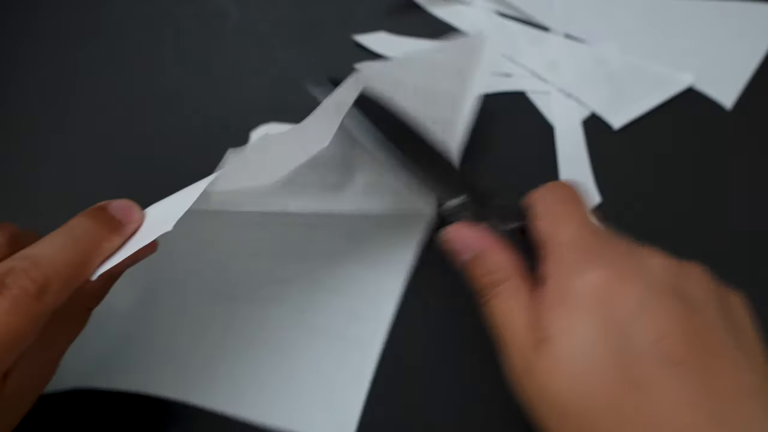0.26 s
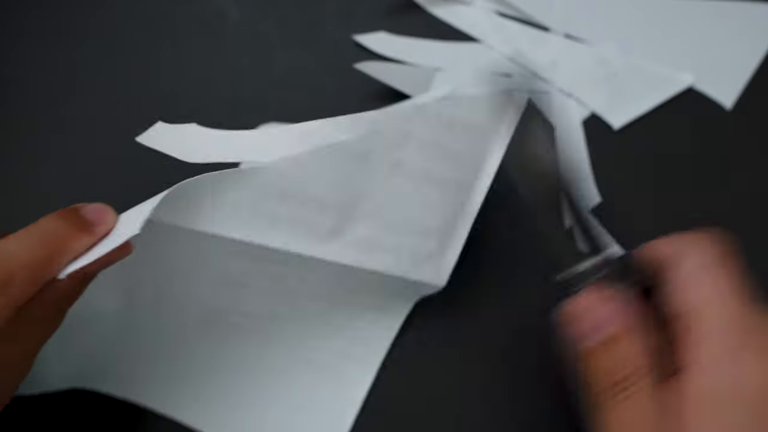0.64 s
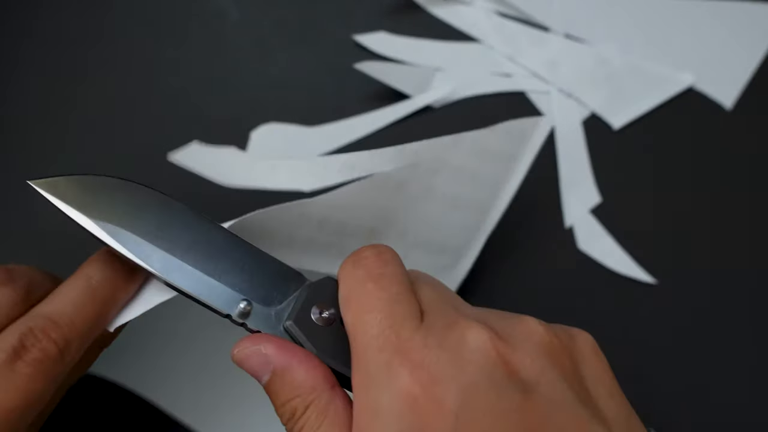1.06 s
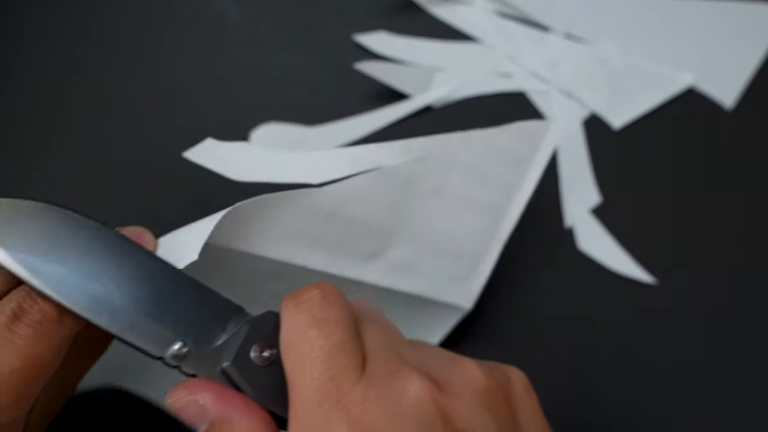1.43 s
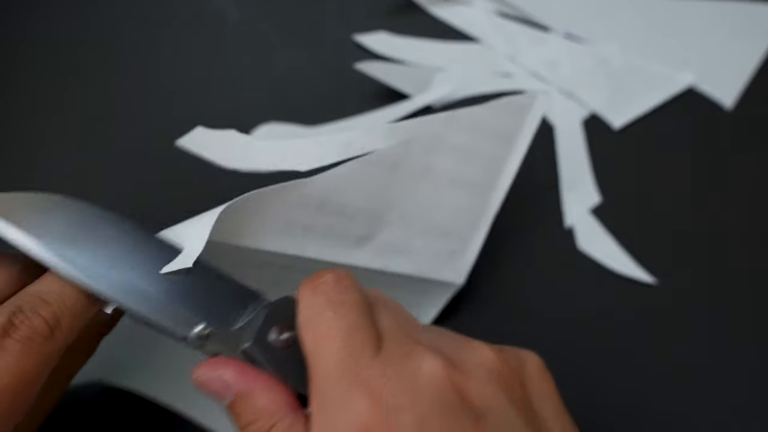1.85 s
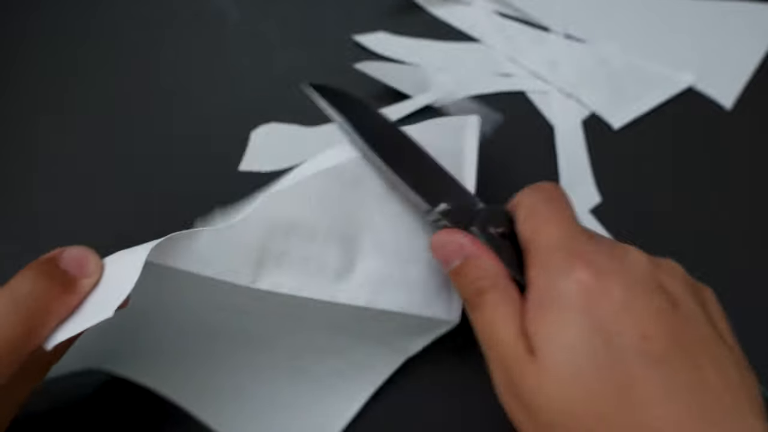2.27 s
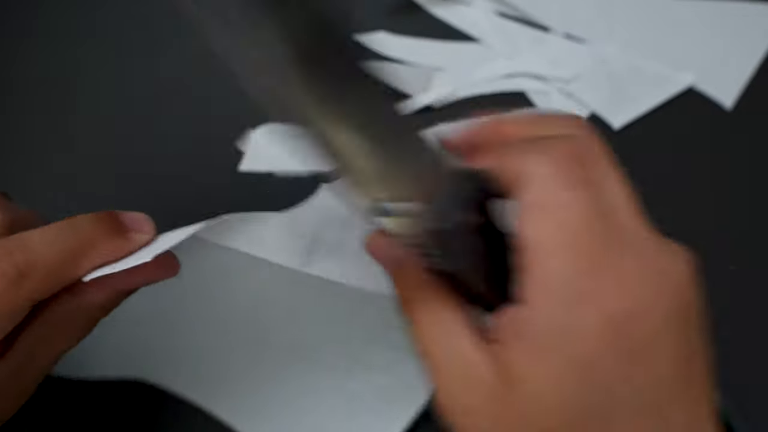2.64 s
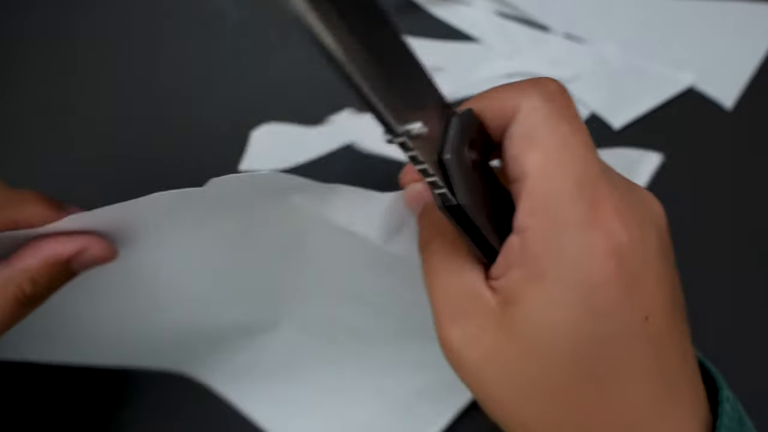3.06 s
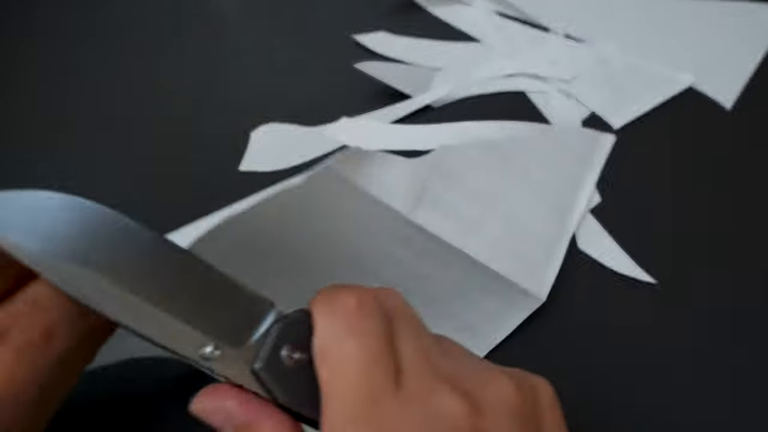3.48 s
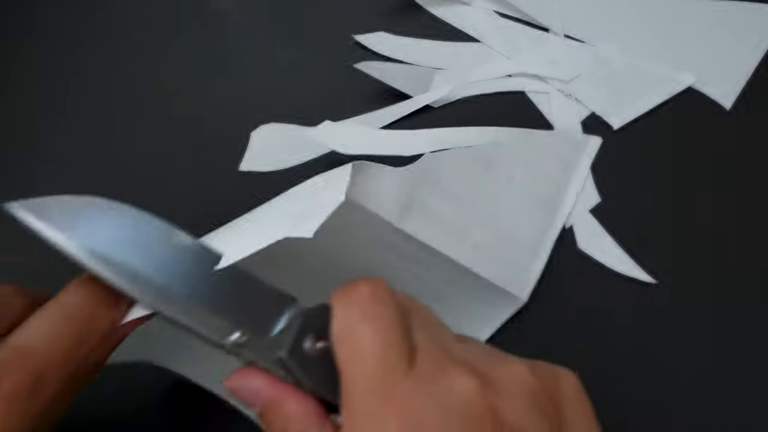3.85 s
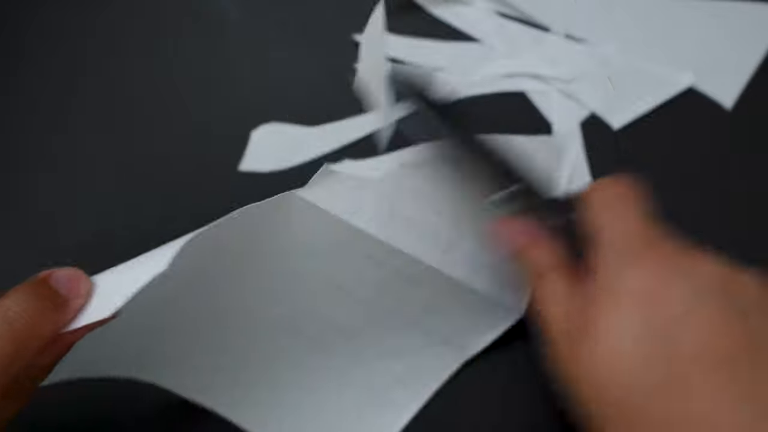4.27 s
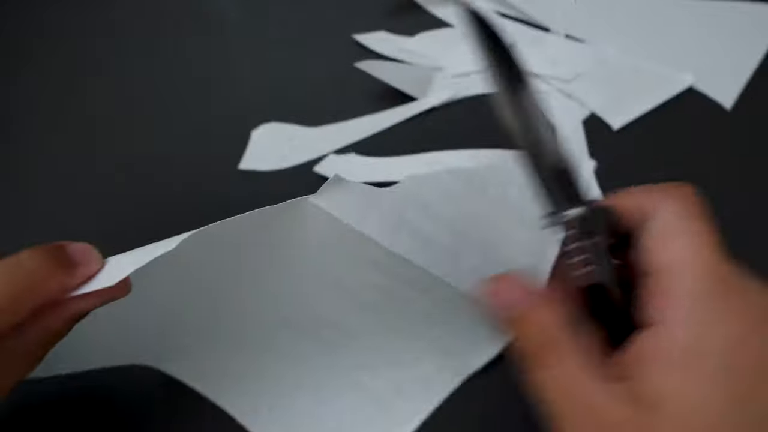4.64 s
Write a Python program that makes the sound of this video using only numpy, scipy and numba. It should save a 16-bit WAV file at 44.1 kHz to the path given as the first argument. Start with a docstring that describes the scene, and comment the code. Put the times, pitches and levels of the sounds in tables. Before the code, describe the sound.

Three crisp cuts tear through stiff paper, each a dense fibrous rasp, separated by soft flapping, crinkling and faint sliding of blade and skin.

```python
"""A knife slices three strips off a hand-held sheet of paper, close to one microphone in a quiet room.
Each cut is a dense crackle of snapping fibres that rings the sheet through moving resonances.
The loose sheet flaps in low noise puffs and buckles in short pitched pops, and grainy hisses are
skin and blade sliding on the paper. The room adds a short diffuse tail, a low hum and a faint hiss."""
import sys
import numpy as np
from scipy import signal
from scipy.fft import rfft, irfft
from scipy.io import wavfile
from scipy.ndimage import uniform_filter1d
from numba import njit

SR = 44100
rng = np.random.default_rng(int(sys.argv[2]) if len(sys.argv) > 2 else 0)


def level_to_linear(level):
    """Convert decibel levels to linear amplitude factors, elementwise."""
    exponent = np.asarray(level, float) / 20
    return 10 ** exponent


def wav_record(signal):
    """Record a signal, one row per channel, as 16-bit PCM in the file named by sys.argv[1]."""
    frames = np.transpose(np.atleast_2d(signal))
    bounded = np.clip(frames, -1, 1)
    # unit amplitude maps onto the largest positive 16-bit level
    quanta = np.round(bounded * 32767).astype(np.int16)
    wavfile.write(sys.argv[1], SR, quanta)


N = 216442  # length in samples

# the three cuts: t/s, tearing level/dB, upper ring f/Hz, low ring f/Hz, low ring level/dB re tearing
CUTS = [
    [(0.0, -27, 4000, 1300, -5.5), (0.04, -24.5, 3570, 1650, -8.5), (0.1, -26.5, 4150, 1340, -2),
     (0.142, -27.5, 4960, 1730, 0.5), (0.188, -25.5, 4430, 1680, -1.5), (0.218, -23.5, 4500, 1360, -4.5),
     (0.254, -26.5, 4370, 1300, -2), (0.342, -30, 4530, 1730, 1.5), (0.466, -37, 4400, 1680, 3),
     (0.516, -32.5, 4140, 1790, -9.5), (0.54, -44.5, 4080, 1820, 9)],
    [(1.943, -40, 4360, 1360, 0), (1.949, -28, 4930, 1540, -4), (1.998, -22.5, 4900, 1720, -10.5),
     (2.022, -23.5, 4560, 1800, -7.5), (2.052, -22.5, 4500, 1740, -15.5), (2.08, -23, 4460, 1680, -3),
     (2.102, -21, 4550, 1440, -13.5), (2.136, -25, 4000, 1260, -2.5), (2.194, -29, 4400, 1390, -8.5),
     (2.236, -24, 4750, 1110, -2.5), (2.275, -42, 4340, 1130, -9)],
    [(3.841, -45.5, 4030, 1410, 1), (3.975, -34.5, 4440, 1390, 3), (4.011, -30.5, 4600, 1930, 6),
     (4.073, -26.5, 4600, 2070, 2.5), (4.113, -28, 4350, 1730, 1.5), (4.153, -26.5, 4900, 1610, 0),
     (4.245, -23.5, 4480, 1720, -2.5), (4.298, -21.5, 4540, 1500, -4), (4.311, -21.5, 4750, 1250, -5.5),
     (4.337, -19.5, 4820, 1340, -8.5), (4.355, -34, 4940, 1330, -24)],
]
# fizz of each cut re its tearing: level at its start/dB, level at its end/dB
CUT_FIZZ_LEVELS = [(-10.5, -3), (-9, -7.5), (-8, -8)]
# spectrum of the cutting fizz: f/Hz, relative level per Hz/dB
FIZZ_SPECTRUM = [(2940, -35), (5000, -8), (6890, 4), (7560, 0), (10000, 4), (12400, 1.5), (16000, -4.5)]
# resonances of the sheet over the table: f/Hz, width/Hz, lift/dB
SHEET_RESONANCES = [(1204, 230, 5.5), (2030, 296, 6), (3280, 690, 6), (5190, 1030, 3), (5920, 800, 2.5),
                    (7890, 1200, 5)]
# short-lived narrow resonances in the cutting and sliding sounds:
# start t/s, end t/s, f/Hz, width/Hz, lift/dB
BRIEF_RINGS = [(0, .16, 15000, 1200, 9), (0.332, .47, 11800, 1300, 10.5), (1.946, 2.092, 1370, 248, 5),
               (1.97, 2.12, 12200, 350, 11), (2.15, 2.245, 4400, 400, 6), (3.05, 3.25, 5100, 500, 6),
               (3.93, 4.11, 5600, 350, 6), (4.3, 4.34, 1300, 300, 6), (4.09, 4.327, 4950, 400, 3.5)]
# the loose sheet wobbles, during the cuts or when let go or turned:
# start t/s, swell/s, hold/s, level/dB, deepest part level/dB re that
WOBBLES = [(0, 0.038, 0.48, -33.5, -13), (.42, 0.06, 0.064, -38.5, -2), (.56, 0.013, 0.096, -53, 2.5),
           (1.11, 0.02, 0.083, -47.5, -10), (1.52, 0.011, 0.09, -49.5, -1), (2.09, 0.064, 0.055, -34.5, -8),
           (2.24, 0.0067, 0.0025, -27, -12.5), (2.28, .01, 0.13, -54.5, 5),
           (2.388, 0.0045, 0.14, -47.5, -7.5), (2.8, 0.1, 0.048, -45, 3), (2.96, 0.024, 0.15, -45, -1.5),
           (3.31, 0.0093, 0.025, -34.5, -5.5), (3.42, 0.074, 0.066, -51, -19),
           (3.625, 0.0037, 0.012, -51, -20), (3.82, 0.063, 0.074, -42, -16)]
# resonances of the flapping sheet: f/Hz, width/Hz, relative level/dB
FLAP_RINGS = [(226, 42, -1), (365, 148, -3), (523, 1040, -5)]
# spectrum of the room floor: f/Hz, relative level per Hz/dB
AIR_SPECTRUM = [(12, -40), (20, 6.5), (40, -6.5), (65, -14), (123, -9.5), (177, -16.5), (248, -14),
                (293, -17), (513, -22.5), (738, -24.5), (802, -24), (1300, -31), (16000, -49.5)]
# decay of the room tail by 60 dB: f/Hz, time/s
ROOM_T60 = [(200, 0.89), (1400, 0.38), (4000, 0.63), (10000, 0.42)]
# the sheet buckles or is touched:
# t/s, peak level/dB, pitch f/Hz, crisp edge level/dB re peak, thump level/dB re peak
POPS = [(0.456, -24, 1890, -8, -0.5), (0.517, -23, 730, -21, -2.5), (0.589, -34.5, 1610, -13, 1.5),
        (1.179, -35, 1850, -16, -26), (1.802, -33.5, 1370, 6, -5.5), (2.199, -9, 1680, -9, -12),
        (2.248, -15.5, 343, -2.5, -7.5), (2.332, -30.5, 1260, 0, -17), (2.391, -32.5, 1010, -2, -0.5),
        (2.474, -29, 980, -26, -2), (2.505, -34.5, 996, -3, 1.5), (2.823, -32.5, 1010, -11, -8),
        (2.852, -29, 960, -25, -5), (2.879, -26.5, 1390, -22, -17), (2.899, -28.5, 1130, -1.5, 1.5),
        (2.952, -29, 1200, -6.5, -14), (2.975, -35, 900, -10, -5), (2.986, -29.5, 1000, -15, -5),
        (3.05, -24, 1460, -12, -22), (3.079, -24.5, 990, -16, -9), (3.2, -47, 1550, -14, 6),
        (3.266, -38, 1290, 3, -20), (3.281, -27.5, 1160, -7, -10), (3.289, -24.5, 1700, -16, -6.5),
        (3.311, -23, 1190, -28, -12), (3.321, -18, 1060, -26, -15.5), (3.326, -19.5, 2300, -25, -10.5),
        (3.336, -22, 1480, -30, -17), (3.36, -29, 1400, -25, -25), (3.435, -39.5, 1010, -2, 3),
        (3.463, -24.5, 1750, -29, -32), (3.468, -26.5, 615, -33, -17), (3.532, -40.5, 750, -8, 2.5),
        (3.626, -40.5, 2030, 5.5, -25), (3.634, -44.5, 395, -26, 3), (3.822, -30, 1930, -22, -4.5),
        (4.333, -9.5, 4500, -10, -18), (4.532, -39, 1190, -19, -25), (4.566, -53, 696, -21, -1),
        (4.609, -48, 1000, -7, -6), (4.678, -50.5, 905, -11, 6), (4.715, -59, 2000, 8, 0)]
# fingers or blade slide on the paper: start t/s, swell/s, hold/s, level/dB, body level/dB re that
SLIDES = [(.55, .005, 0.037, -49, -2), (.615, 0.0032, 0.034, -49.5, -2), (.74, 0.013, 0.021, -54.5, -3.5),
          (.8, 0.026, 0.13, -62, 0), (1.055, .005, 0.027, -62, 0), (1.11, 0.0077, .08, -46.5, -3),
          (1.25, 0.029, 0.013, -53, -2.5), (1.39, .002, .015, -56, -2), (1.4, 0.029, 0.033, -53, -1),
          (1.48, 0.057, 0.021, -46, -4), (1.57, 0.0082, 0.036, -53, -1), (1.8, 0.0036, 0.0086, -46, -2),
          (1.892, 0.0017, .003, -42, -2.5), (1.908, .002, .008, -41, -6),
          (1.921, 0.003, 0.0036, -37.5, -1.5), (1.936, .002, .006, -38, -13),
          (2.27, 0.0055, 0.092, -43, -2.5), (2.37, .01, 0.096, -54, -12), (2.5, 0.0054, 0.026, -54.5, -9),
          (2.6, 0.027, 0.047, -54, -1), (2.7, 0.0091, 0.06, -52, -1), (2.79, 0.0099, 0.19, -49.5, -4),
          (2.95, 0.077, 0.12, -42.5, -5.5), (3.17, 0.012, 0.056, -50.5, -4), (3.225, 0.022, 0.034, -60, 6),
          (3.262, 0.0082, 0.26, -53.5, 2.5), (3.553, 0.0023, 0.17, -54, -3), (3.762, 0.0016, 0.013, -43, 0),
          (4.355, .005, 0.038, -42.5, -9), (4.56, 0.062, .12, -61, -7), (4.705, .008, 0.054, -60, -3.5),
          (4.76, 0.015, .15, -56, -2)]
# spectrum of the sliding hiss: f/Hz, relative level per Hz/dB
SLIDE_SPECTRUM = [(1180, -22), (2000, -27), (4450, -3.5), (4990, -8), (6090, -9), (11100, -16),
                  (16000, -20)]

UPPER_RING_DB = -1  # re tearing
CUT_WOBBLE_DB, CUT_DEEP_DB = -14, -14  # shake of a cut re its low ring, deepest part re that
WOBBLE_SAG_DB_S, WOBBLE_FALL_DB_S = 37, 282  # loss from the end of the swell, extra loss after the hold
SLIDE_SAG_DB_S, SLIDE_FALL_DB_S = 26, 330
SWELL_POWER = 0.73  # a swell grows as this power of its time
POP_T60_S = 0.038
AIR_DB, ROOM_DB = -52.5, -15.5  # floor rms, tail energy re direct sound
TOP_HZ = 15900


def level(x, db):
    """Scale to an rms level."""
    return x * level_to_linear(db) / np.sqrt(np.mean(x ** 2))


@njit
def svf(x, hz, width):
    """State-variable band-pass with a moving centre, gain 1 at the centre."""
    y, mid, low = np.empty(len(x)), 0., 0.
    for i in range(len(x)):
        g = np.tan(np.pi * hz[i] / SR)
        damping = width / hz[i]
        v = (mid + g * (x[i] - low)) / (1 + g * (g + damping))
        mid = 2 * v - mid
        low = low + 2 * g * v
        y[i] = damping * v
    return y


def band(x, hz, width_hz):
    """Band-pass at a fixed or moving centre."""
    centre = np.clip(hz + np.zeros(len(x)), 20, SR / 2.5)
    return svf(x, centre, max(1. * width_hz, 10.))


def colour(x, points):
    """Shape a spectrum by (Hz, dB) points, joined by lines over log frequency."""
    hz, db = np.transpose(points)
    f = np.maximum(np.arange(len(x) // 2 + 1) * SR / len(x), 1)
    gain = level_to_linear(np.interp(np.log(f), np.log(hz), db))
    return irfft(rfft(x) * gain, len(x))


def walk(rate):
    """Random levels held 1 / rate s and slewed twice; spread near 1."""
    hold = max(int(SR / rate), 1)
    steps = np.repeat(rng.standard_normal(N // hold + 1), hold)
    return uniform_filter1d(uniform_filter1d(steps, hold), hold)[:N]


def play(tables):
    """Join the tables into per-sample columns, with a gain that is silent between them."""
    t = np.arange(N) / SR
    s, *columns = np.concatenate(tables).T
    order = np.argsort(s, kind="stable")
    on = sum((t >= rows[0][0]) & (t <= rows[-1][0]) for rows in tables) > 0
    columns = [np.interp(t, s[order], c[order]) for c in columns]
    gain = uniform_filter1d(on * level_to_linear(columns[0]), size=120)
    return gain, columns[1:]


def strokes(rows, sag_db_s, fall_db_s):
    """Each row swells, holds while sagging and falls away; gains of its main and second parts."""
    t, main, second = np.arange(N) / SR, 0, 0
    for s, swell, hold, db, second_db in rows:
        since = t - s - swell
        rise = np.clip((t - s) / max(swell, 1e-3), 0, 1) ** SWELL_POWER
        loss_db = sag_db_s * np.maximum(since, 0) + fall_db_s * np.maximum(since - hold, 0)
        power = (rise * level_to_linear(db - loss_db)) ** 2
        main = main + power
        second = second + power * level_to_linear(second_db) ** 2
    return np.sqrt(main), np.sqrt(second)


def snaps(per_s, spread_db, hiss_db):
    """Fibres let go at random moments, a few far harder than the rest, over a fine hiss."""
    hit = rng.random(N) < per_s / SR
    size = np.minimum(rng.exponential(size=N), 5)
    crackle = level(hit * level_to_linear(spread_db * size), 0)
    return crackle + level(rng.standard_normal(N), hiss_db)


def sheet(x, patchy_db):
    """Resonances swell and drift as the sheet bends; waves bounce back from edges and creases."""
    for hz, width_hz, db in SHEET_RESONANCES:
        lift = level_to_linear(db + patchy_db * walk(20)) - 1
        x = x + lift * band(x, hz * np.exp(0.041 * walk(9)), width_hz)
    # edges and creases lie at uneven distances
    lags = (SR * rng.uniform(0.0005, 0.006, size=12)).astype(int)
    shares = [0.17 * walk(16) for _ in lags]
    echoes = sum(g * np.roll(x, lag) for g, lag in zip(shares, lags))
    # the echoes only share out the energy of the source
    return (x + echoes) / np.sqrt(1 + np.sum(np.square(shares), axis=0))


def brief_rings(x):
    """Short-lived narrow resonances fade in and out over about 20 ms."""
    t = np.arange(N) / SR
    for start, end, hz, width_hz, db in BRIEF_RINGS:
        on = uniform_filter1d(1. * ((t >= start) & (t < end)), size=880)
        x = x + on * (level_to_linear(db) - 1) * band(x, hz, width_hz)
    return x


def cut():
    """Tearing fibres ring the free strip, whose two main resonances move as the blade travels."""
    gain, (upper_hz, low_hz, low_db) = play(CUTS)
    ends = [rows[k][0] for rows in CUTS for k in (0, -1)]
    fizz_db = np.interp(np.arange(N) / SR, ends, np.ravel(CUT_FIZZ_LEVELS))
    # low ring, upper ring and fizz each flutter in level at random, independently
    flutters = [level_to_linear(1.5 * walk(110)) for _ in range(3)]
    fibres = brief_rings(sheet(snaps(6000, 2.6, 1.5), patchy_db=1.5))
    low_tilt = [(300, 12), (700, 5.5), (1000, 4.5), (2300, -2.0), (4000, -16.5)]
    low = level(colour(band(fibres, low_hz, 1030), low_tilt), 0)
    upper = level(band(band(fibres, upper_hz, 1440), 2560, 6200), 0)
    fizz = level(colour(fibres, [(2500, -65)] + FIZZ_SPECTRUM), 0)
    low = level_to_linear(low_db) * flutters[0] * low
    upper = level_to_linear(UPPER_RING_DB) * flutters[1] * upper
    fizz = level_to_linear(fizz_db) * flutters[2] * fizz
    return gain * (low - upper + fizz)  # the upper ring is in opposite polarity


def flap():
    """The wobbling sheet pushes air in uneven low puffs, coloured by the gap over the table."""
    gain, deep_gain = strokes(WOBBLES, WOBBLE_SAG_DB_S, WOBBLE_FALL_DB_S)
    tearing, (_, _, low_db) = play(CUTS)
    shake = tearing * level_to_linear(low_db + CUT_WOBBLE_DB)  # a cut shakes the sheet too
    push = rng.standard_normal(N) * level_to_linear(6.5 * walk(29.9))
    rings = [level_to_linear(db) * band(band(push, hz, w), hz, 2 * w) for hz, w, db in FLAP_RINGS]
    puffs = level(sum(rings), 0)
    deep = level(band(band(push, 125, 52), 110, 110), 0)
    return np.hypot(gain, shake) * puffs + np.hypot(deep_gain, level_to_linear(CUT_DEEP_DB) * shake) * deep


def air():
    """Room hum and microphone hiss, noise shaped by its spectrum and wavering a little."""
    floor = colour(rng.standard_normal(N), AIR_SPECTRUM)
    return level(floor * level_to_linear(1.8 * walk(3.18)), AIR_DB)


def room(x):
    """A diffuse tail from 8 ms on, built of octave bands of noise that each decay at their own rate."""
    t, tail = np.arange(SR) / SR, 0
    hz, t60 = np.transpose(ROOM_T60)
    for f in 125 * 2. ** np.arange(8):
        fade = np.exp(-np.log(1000) * t / np.interp(np.log(f), np.log(hz), t60))
        tail = tail + fade * band(rng.standard_normal(SR), f, 0.9 * f)
    tail = tail * np.clip((t - 0.008) / 0.0029, 0, 1)
    tail = level_to_linear(ROOM_DB) * tail / np.sqrt(np.sum(tail ** 2))
    return signal.fftconvolve(x, tail)[:N]


def burst(noise, hz, width_hz, t60, db):
    """A rattle that builds for a moment, snaps through and dies, in a band; scaled to its peak."""
    t = np.arange(len(noise)) / SR
    rattle = noise * (1 - np.exp(-t / 0.0029)) * np.exp(-np.log(1000) * t / t60)
    snap = 1.19 * np.exp(-((t - 0.0025) * hz * 8.8) ** 2)
    ring = band(band(rattle - snap, hz, width_hz), hz, 1.28 * width_hz)
    return level_to_linear(db) * ring / np.abs(ring).max()


def pops():
    """A buckle snaps along a crease for a few ms: a pitched burst, a crisp edge and a slower thump."""
    out = np.zeros(N + SR)
    noises = rng.standard_normal((len(POPS), 3, SR // 5))
    for (s, db, hz, crisp_db, thump_db), (a, b, c) in zip(POPS, noises):
        i = int(s * SR)
        out[i:i + len(a)] += burst(a, hz, 1.12 * hz, POP_T60_S, db)
        out[i:i + len(a)] += burst(b, 3800, 5800, 0.025, db + crisp_db)
        out[i:i + len(a)] += burst(c, 225, 550, 0.092, db + thump_db)
    return out[:N]


def handling():
    """Skin and blade slide on the paper with a grainy hiss over a duller body."""
    gain, body_gain = strokes(SLIDES, SLIDE_SAG_DB_S, SLIDE_FALL_DB_S)
    rubbing = snaps(6000, 3, 1.5) * level_to_linear(2.2 * walk(70))
    grain = brief_rings(sheet(rubbing, patchy_db=1))
    slide = level(colour(grain, [(900, -50)] + SLIDE_SPECTRUM), 0)
    body = level(band(band(grain, 1750, 2300), 670, 3150), 0)
    return gain * slide + body_gain * body


def scene():
    """Paper sounds, their room tail and the floor, at one microphone; the same on both channels."""
    paper = cut() + handling() + flap() + pops()
    return np.tile(paper + room(paper) + air(), (2, 1))


def low_pass(x):
    """Removes everything above the highest recorded frequency."""
    return signal.sosfilt(signal.butter(12, 16480, fs=SR, output="sos"), x)


def record(dry):
    """The microphone loses the deepest bass; the top is cut."""
    bass_cut = signal.butter(2, 40, "high", fs=SR, output="sos")
    top_cut = signal.ellip(8, 0.2, 70, TOP_HZ, fs=SR, output="sos")
    mix = signal.sosfilt(top_cut, signal.sosfilt(bass_cut, dry))
    return low_pass(mix)


dry = scene()
out = record(dry)
wav_record(out)
```